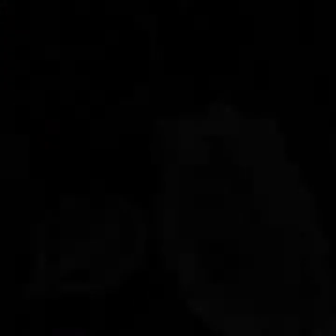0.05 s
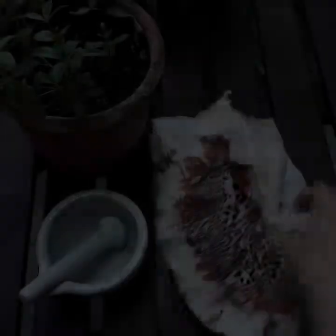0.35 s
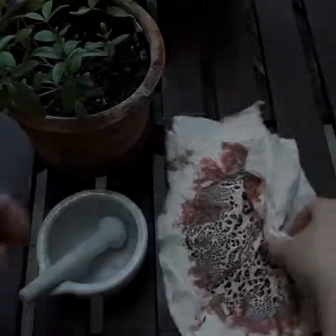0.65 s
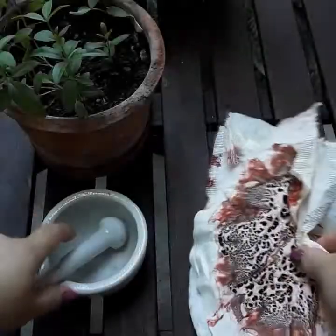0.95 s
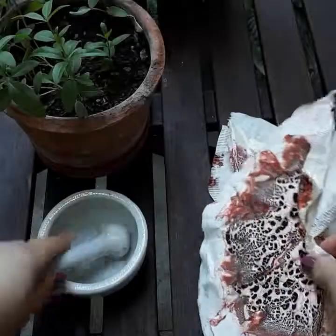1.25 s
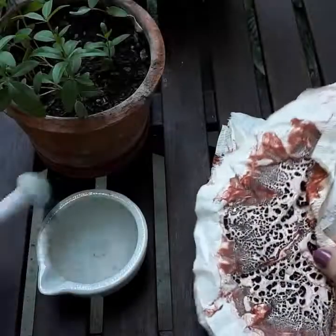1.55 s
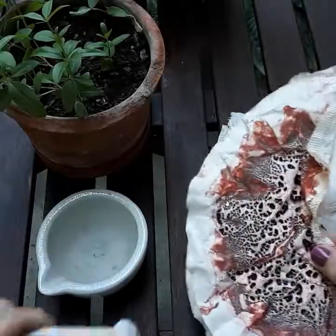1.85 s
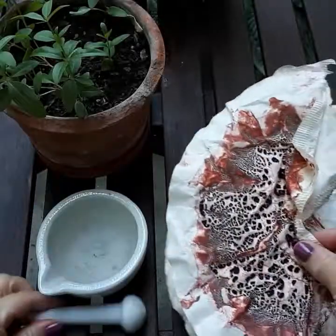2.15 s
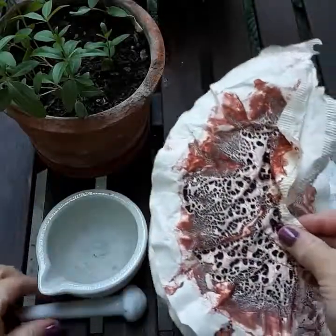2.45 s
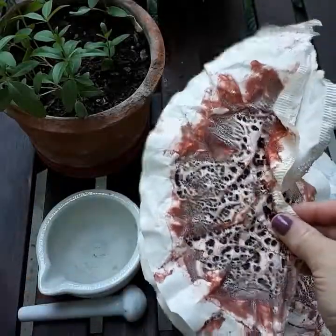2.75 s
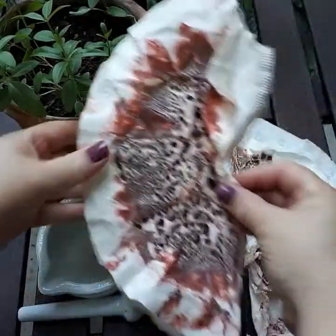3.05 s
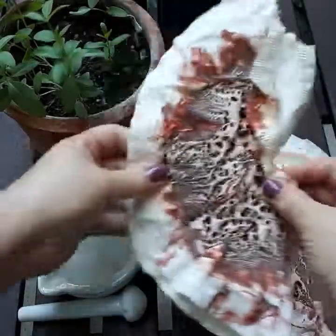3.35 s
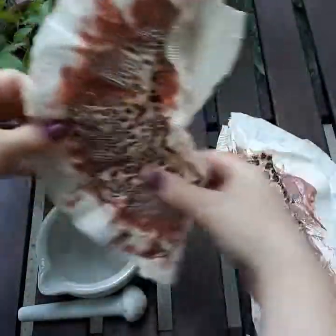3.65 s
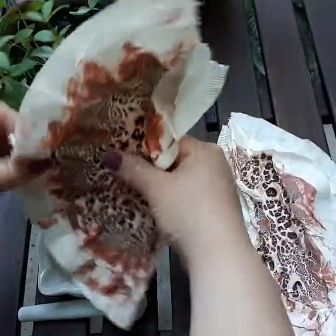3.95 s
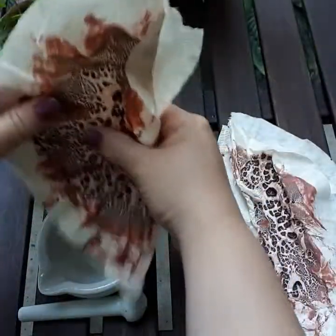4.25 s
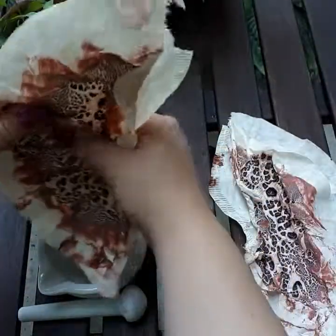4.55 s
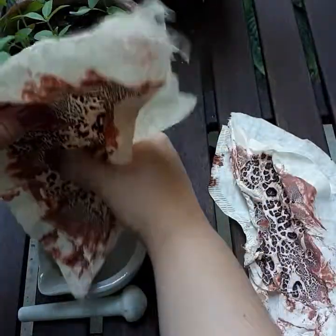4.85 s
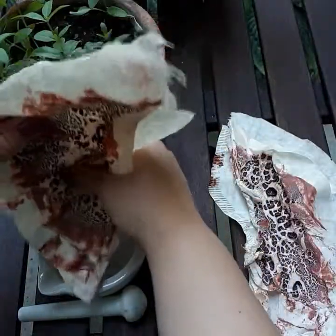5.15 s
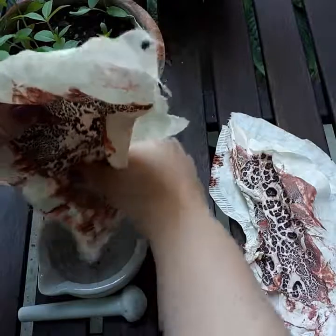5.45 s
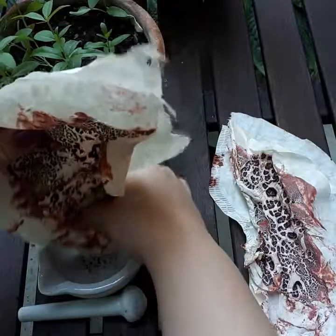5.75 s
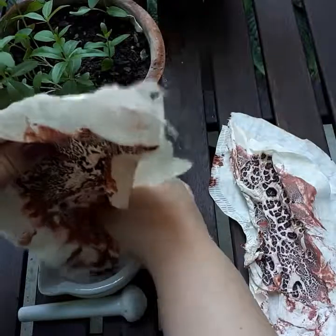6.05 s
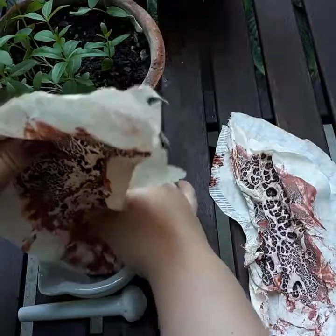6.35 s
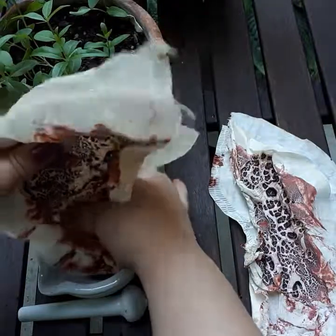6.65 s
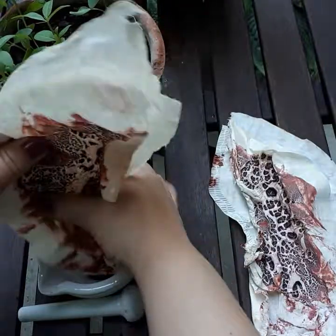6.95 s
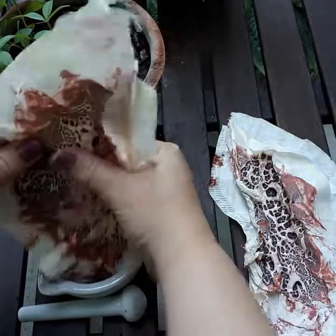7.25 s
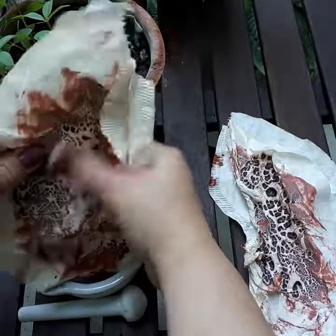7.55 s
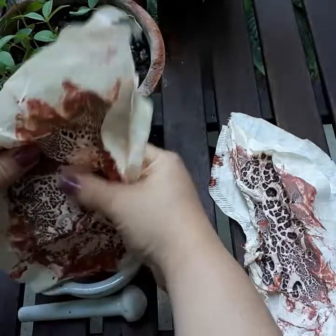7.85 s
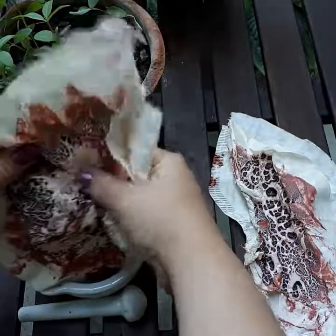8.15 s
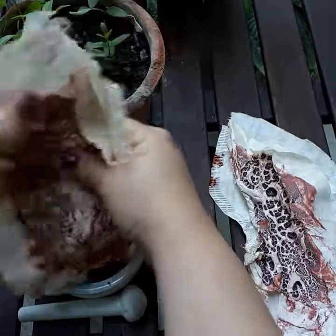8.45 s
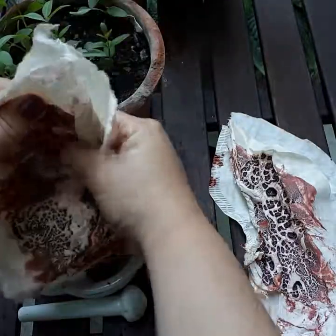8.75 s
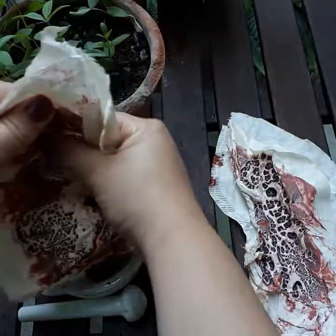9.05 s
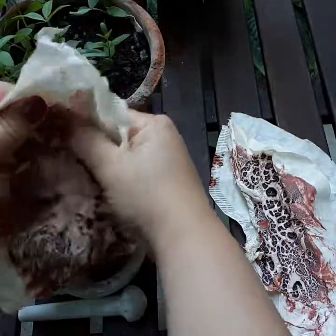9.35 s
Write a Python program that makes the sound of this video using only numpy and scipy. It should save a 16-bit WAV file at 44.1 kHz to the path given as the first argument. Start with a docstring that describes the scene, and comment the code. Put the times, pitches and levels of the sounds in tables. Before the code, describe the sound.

Crusty paper towel rasps and crackles between the fingers after a porcelain pestle scrapes, knocks on wood and clinks against a mortar.

```python
"""Crusty paper rasps and crackles over a faint outdoor rumble, with a few knocks and porcelain clinks early on.
A paper towel crusted with dried pigment is picked up from a slatted wooden table. A porcelain pestle
slides out of its mortar, knocks twice on the wood and rolls against the bowl, which rings.
Then the towel is flexed and rubbed over the mortar: fibres slip, the crust snaps, the sheet buckles."""
import sys
import numpy as np
from scipy import signal
from scipy.fft import rfft, irfft
from scipy.io import wavfile
from scipy.ndimage import uniform_filter1d

SR = 44100
rng = np.random.default_rng(int(sys.argv[2]) if len(sys.argv) > 2 else 0)


def file_out(sig):
    """Save sig as 16-bit WAV at sys.argv[1]."""
    # one column per channel
    cols = np.atleast_2d(sig).T
    # limit, then scale
    lim = np.clip(cols, -1, 1)
    pcm = np.round(lim * 32767).astype(np.int16)
    wavfile.write(sys.argv[1], SR, pcm)


N = 423801
TIME = np.arange(N) / SR
LEFT_RIGHT = np.array([[1], [-1]])


def from_db(db):
    """Decibels to gain."""
    return 10 ** (np.asarray(db) / 20)


def rms_one(x):
    """Scale to rms 1."""
    return x / np.sqrt(np.mean(x ** 2) + 1e-20)


def peak_one(x):
    """Scale the loudest 2 ms to rms 1."""
    return x / np.sqrt(uniform_filter1d(np.mean(x ** 2, axis=0), size=88).max() + 1e-20)


def evened(x):
    """Hold the rms at 1 over 25 ms; faster flicker stays."""
    return x / np.sqrt(uniform_filter1d(np.mean(x ** 2, axis=0), size=1100) + 1e-9)


def add(out, start_s, x):
    """Mix in a stereo sound."""
    at = max(int(start_s * SR), 0)
    out[:, at:at + x.shape[1]] += x[:, :N - at]


def drift(per_s):
    """Random wander, rms 1."""
    knots = rng.standard_normal(8192)
    return rms_one(np.interp(TIME * per_s, np.arange(len(knots)), knots))


def closeness(hz, centre_hz, octaves):
    """Bell curve over pitch, 1 at the centre."""
    return np.exp(-(np.log2(hz / centre_hz) / octaves) ** 2)


def band(x, low_hz, high_hz):
    """Butterworth band-pass."""
    sos = signal.butter(3, [low_hz, min(high_hz, .45 * SR)], "band", fs=SR, output="sos")
    return signal.sosfilt(sos, x)


def resonance(x, hz, width_hz):
    """Resonator, peak gain 1."""
    return signal.lfilter(*signal.iirpeak(hz, hz / width_hz, fs=SR), x)


def colour(x, spectrum):
    """Minimum-phase filter from rows of (frequency [Hz], gain [dB])."""
    hz, db = np.transpose(spectrum)
    grid_hz = np.maximum(np.fft.rfftfreq(8192, 1 / SR), 1)
    gain = from_db(np.interp(np.log(grid_hz), np.log(hz), db))
    cepstrum = irfft(np.log(gain))
    half = len(cepstrum) // 2
    causal = np.r_[1, np.full(half - 1, 2), 1, np.zeros(half - 1)]
    response = irfft(np.exp(rfft(cepstrum * causal)))[:half]
    return signal.fftconvolve(x, response[None], axes=1)[:, :x.shape[1]]


def ports(x, lag_s):
    """A sound reaches two microphone ports lag_s apart."""
    hz = np.fft.rfftfreq(len(x), 1 / SR)
    return irfft(rfft(x) * np.exp(1j * np.pi * hz * lag_s * LEFT_RIGHT), len(x))


def stereo_noise(count, apart_hz):
    """Noise, alike in both channels below apart_hz, unrelated above."""
    mid, side = rng.standard_normal((2, count))
    side = signal.lfilter(*signal.butter(1, apart_hz, "high", fs=SR), side)
    return mid + side * LEFT_RIGHT


def ring(modes, spread_rad, t60_scale=1):
    """Struck modes decay, each with its own phase at each port."""
    out, t = 0, TIME[:SR // 2]
    for k, (hz, db, t60_s) in enumerate(modes):
        phase = np.pi * k + spread_rad * rng.normal(0, 1, (2, 1))
        decay = from_db(db - 60 * t / (t60_s * t60_scale))
        out = out + decay * np.sin(2 * np.pi * hz * t + phase)
    return out


def outdoors(hum_hz=99.0, hum_db=-9.5):
    """Distant rumble and hiss with a wavering hum."""
    # air spectrum: (frequency [Hz], relative level [dB])
    air_spectrum = [(15, -41), (25, -18.5), (102, -8), (130, -13.5), (170, -11.5), (200, -19.5), (427, -26),
                    (476, -20.5), (607, -29), (1160, -37), (4250, -47.5), (16000, -50.5)]
    # distant rumble: (time [s], level [dB])
    rumble = [(0, -69.5), (1.4, -65), (2.4, -67), (5.2, -67), (6.4, -63.5), (9.6, -63.5)]
    air = rms_one(colour(stereo_noise(N, apart_hz=400), air_spectrum))
    hum_gain = from_db(hum_db + 3.3 * drift(3.9))
    hum = hum_gain * np.sin(2 * np.pi * hum_hz * TIME + 0.62 * drift(14))
    return from_db(np.interp(TIME, *np.transpose(rumble))) * (air + hum)


def far_tone(waver_hz=5.3):
    """A faint, nearly pure tone swells and fades in the distance."""
    # course of the tone: (time [s], pitch [Hz], level [dB])
    course = [(2.45, 470, -100), (2.6, 468, -75), (2.75, 472, -73), (2.85, 480, -74), (3.05, 470, -71),
              (3.15, 468, -100)]
    s, hz, db = np.transpose(course)
    pitch_hz = np.interp(TIME, s, hz) + waver_hz * drift(30)
    return from_db(np.interp(TIME, s, db)) * np.sin(2 * np.pi * np.cumsum(pitch_hz) / SR)


def reflections(x, wet_db=-16, t60_s=0.15):
    """Table and nearby walls return a short, slightly dull scatter."""
    t = TIME[:SR // 2]
    decay = from_db(-60 * t / t60_s) * (t > .004)
    scatter = band(stereo_noise(len(t), apart_hz=1200), 193, 8000) * decay
    scatter /= np.sqrt(np.sum(scatter ** 2) / 2)
    return from_db(wet_db) * signal.oaconvolve(x, scatter, axes=1)[:, :N]


def sliding(focus_db=7):
    """Unglazed porcelain grits along; the spot touched favours one resonance."""
    # pestle leaves the bowl, slips in the fingers, rolls on the slat:
    # (time [s], level [dB], favoured frequency [Hz], brightness [dB])
    slide = [(1.04, -95, 1410, 0), (1.07, -70, 1410, 19), (1.12, -53, 1450, 2), (1.21, -62, 1400, -10),
             (1.24, -61, 900, -4), (1.285, -57, 720, -14), (1.35, -82, 720, 9.5), (1.63, -97, 1800, -3),
             (1.71, -68, 1900, 4), (1.78, -73, 1900, 2), (1.83, -94, 1800, -3), (2.07, -98.5, 420, -11.5),
             (2.12, -62, 450, -24), (2.22, -71, 1380, -17), (2.29, -100, 1400, -24)]
    # porcelain resonances: (centre [Hz], width [Hz], gain [dB])
    bowl = [(420, 98, -4.5), (720, 770, -1.5), (1440, 560, -1), (2420, 700, -2), (5450, 530, 3),
            (6700, 1400, 1)]
    s, *columns = np.transpose(slide)
    level_db, favoured_hz, bright_db = (np.interp(TIME, s, c) for c in columns)
    grit = stereo_noise(N, apart_hz=2940) * from_db(2.1 * drift(370))
    out = 0
    for hz, width_hz, db in bowl:
        gain = from_db(db + focus_db * closeness(hz, favoured_hz, 0.64) + bright_db * (hz > 3000))
        out = out + gain * resonance(resonance(grit, hz, width_hz), hz, width_hz)
    return from_db(level_db) * evened(out)


def knocks(thud_t60_s=0.11, strike_s=0.0011):
    """Porcelain hits a slat: a crack, the slat's main modes and a dense wash of weaker ones."""
    # pestle on the table: (time [s], thud peak [dB], crack re thud [dB])
    hits = [(2.0625, -23, -32.5), (2.0836, -32.5, -33.5), (2.2698, -28, -21), (2.2804, -29.5, -27)]
    # slat modes: (frequency [Hz], level [dB], t60 [s])
    wood = [(246.4, -18, 0.23), (438, -8.5, 0.21), (479, -11.5, 0.094), (638, 7.5, 0.031), (783, 2.5, 0.08),
            (1030, -9, 0.12), (1310, -3, 0.1), (1630, -16, 0.1), (1830, -16, 0.116), (2010, -9.5, 0.091),
            (2130, -11, 0.078), (2320, -15, 0.086), (2420, -10.5, 0.069), (2456, -21.5, 0.098)]
    # weaker modes: (frequency [Hz], relative level [dB])
    wash_spectrum = [(59, -58), (100, -1.5), (206, -13), (423, 1.5), (571, 0), (803, 6), (906, -4),
                     (1590, 0), (1940, -12), (2320, 1), (2950, -13.5), (5720, -34.5), (12000, -79.5),
                     (15600, -107), (22000, -120)]
    out, t = np.zeros((2, N)), TIME[:SR // 2]
    wash_decay = np.exp(-t / strike_s) + from_db(-6.5 - 60 * t / thud_t60_s)
    crack_decay = np.exp(-t / .002) + 0.44 * np.exp(-t / 0.02)
    for s, db, crack_db in hits:
        wash = colour(stereo_noise(len(t), apart_hz=2500) * wash_decay, wash_spectrum)
        crack = stereo_noise(len(t), apart_hz=3000) * crack_decay
        crack = band(band(crack, 3200, 6600), 4800, 11000)
        slat = peak_one(ring(wood, spread_rad=.3))
        thud = peak_one(band(peak_one(wash) + from_db(-3) * slat, 120, 9000))
        add(out, s, from_db(db) * (thud + from_db(crack_db) * peak_one(crack)))
    return out


def clinks(focus_db=8, soft_db_per_octave=16):
    """A hard tick jolts the bowl and sets it ringing; the spot touched favours some modes."""
    # pestle on the mortar: (time [s], ring [dB], contact noise [dB], favoured frequency [Hz],
    # share of the free ring time that the hand leaves [0-1])
    hits = [(0.991, -56, -62, 4740, 0.47), (1.135, -38.5, -55, 4700, 0.18), (1.276, -58, -59, 5640, 0.38),
            (2.275, -55.5, -68.5, 5300, 0.94), (2.345, -36.5, -33, 5250, 0.91)]
    # porcelain modes: (frequency [Hz], level [dB], free t60 [s])
    porcelain = [(2977, -20, 0.11), (4624, -5, 0.41), (4834, 0, 0.2), (5534, -9, 0.26), (5631, -9, 0.2),
                 (10680, -36, 0.27), (11020, -29, 0.21), (13850, -21, 0.17), (14180, -24, 0.15)]
    out, t = np.zeros((2, N)), TIME[:SR // 2]
    tick_decay = np.exp(-t / 0.0015) + 0.036 * np.exp(-t / 0.0089)
    for s, ring_db, contact_db, favoured_hz, free in hits:
        modes = []
        for hz, db, t60_s in porcelain:
            lift_db = focus_db / free * closeness(hz, favoured_hz, 0.098)
            # a held pestle touches softly and spares the high modes
            tilt_db = soft_db_per_octave * (1 - free) * np.log2(hz / favoured_hz)
            modes.append((hz, db + lift_db - tilt_db, t60_s))
        tick = band(stereo_noise(len(t), apart_hz=3000) * tick_decay, 1800, 3460)
        jolt = band(stereo_noise(len(t), apart_hz=2920) * np.exp(-t / 0.019), 320, 840)
        contact = peak_one(tick) + from_db(-6.5) * peak_one(jolt)
        ringing = peak_one(ring(modes, spread_rad=1, t60_scale=free))
        add(out, s, from_db(ring_db) * ringing + from_db(contact_db) * contact)
    return out


def twang(hz, cycles, count):
    """Stiff paper rings briefly, falling to 1/e in the given cycles."""
    t = TIME[:count]
    return np.sin(2 * np.pi * hz * t) * np.exp(-t * hz / cycles)


def paper_bands(x):
    """The cupped sheet radiates clicks; returns body, rasp and fizz bands."""
    # paper spectrum: (frequency [Hz], gain [dB])
    paper = [(88, -33.5), (150, -12), (254, -11), (494, -3), (689, -5.5), (888, -10.5), (1260, -1),
             (1900, -5.5), (2550, -5), (3920, -7), (7620, -12.5), (8900, -17.5), (11000, -13), (15100, -16),
             (16000, -33)]
    # resonances of the cupped sheet: (centre [Hz], width [Hz], gain [dB])
    cup = [(600, 97, 1), (900, 54, -5), (1350, 210, 0), (1890, 190, -0.5), (2510, 710, 4.5), (3370, 300, 2),
           (7440, 1830, 5.5), (8580, 820, -2)]
    x = colour(x, paper)
    for hz, width_hz, db in cup:
        x = x + (from_db(db) - 1) * resonance(x, hz, width_hz)
    return band(x, 100, 900), band(x, 900, 4500), band(x, 4500, 19000)


def buckles():
    """The whole sheet flips to a new shape with a dry, dull pop."""
    # pops: (time [s], peak [dB], ring [Hz])
    pops = [(3.483, -47, 560), (4.598, -40.5, 570), (4.751, -34.5, 487), (7.8433, -27.5, 450),
            (7.912, -45.5, 482), (8.573, -44, 600), (9.1315, -26, 553), (9.351, -30.5, 510)]
    out = np.zeros((2, N))
    for s, db, hz in pops:
        pop = twang(hz, cycles=0.94, count=2048) + .5 * twang(2.4 * hz, cycles=0.63, count=2048)
        add(out, s, from_db(db) * peak_one(ports(band(pop, 353, 7300), lag_s=.00002)))
    return out


def handling(grip_s=0.0037, swell_db=9.5, let_go_s=0.017):
    """Squeezes grip, swell, ease and let go; returns rasp, body and fizz gains and the fold's pitch."""
    # light rustle of the towel in the hands: (time [s], rasp [dB])
    holding = [(.4, -94), (.5, -62.5), (1.15, -66.5), (1.35, -84.5), (2.9, -103), (3.08, -72.5),
               (3.1, -66.5), (4.5, -60), (5.5, -59), (6.9, -57.5), (9.6, -55.5)]
    # squeezes and drags: (start [s], length [s], rasp at crest [dB], crest position [0-1], # body re rasp [dB],
    # fizz re rasp [dB], fold resonance [Hz]); the short row at 1.513 s is a light tick of the pestle, voiced
    # here as a brief rasp
    squeezes = [(0.447, 0.23, -57, 0.12, -4, -10, 1810), (0.619, 0.15, -51, 0.62, -4, -3.5, 1870),
                (0.794, 0.24, -51.5, 0.34, -1.5, -5.5, 1630), (1.398, 0.086, -72, 0.97, -1, 1, 1730),
                (1.513, 0.058, -71, 0.054, 3, 1, 1970), (1.685, 0.1, -70.4, 0.35, -13, -2, 2250),
                (3.101, 0.093, -47.5, 0.52, -4.5, -8.5, 1580), (3.157, 0.14, -56.9, 0.83, 0.5, -5.5, 1730),
                (3.376, 0.2, -54.5, 0.12, -5, -5.5, 1700), (3.625, 0.069, -49, 0.38, -6.5, -11, 1440),
                (3.714, 0.087, -50, 0.88, -5, -1.5, 1780), (3.917, 0.23, -49, 0.32, -6.5, -3.5, 1620),
                (4.208, 0.22, -45.5, 0.37, -6, -9, 1690), (4.471, 0.17, -42.5, 0.85, -10.5, -5.5, 1860),
                (4.641, 0.23, -37.5, 0.15, -8.5, -1.5, 1840), (4.997, 0.29, -40, 0.063, -13, -3, 1860),
                (5.35, 0.069, -38.5, 0.08, -13.5, -3, 1820), (5.524, 0.071, -42.2, 0.24, -18, 2, 2200),
                (5.618, 0.2, -46, 0.45, -11, -2, 2460), (5.907, 0.18, -36, 0.48, -14, -2.5, 2140),
                (6.019, 0.17, -41, 0.44, -11.5, -2.5, 2260), (6.245, 0.27, -39.5, 0.58, -13.5, -4.5, 1900),
                (6.528, 0.083, -44, 0.85, -3, -6, 1830), (6.641, 0.11, -37, 0.16, -7, -7, 1900),
                (6.739, 0.12, -42, 0.92, -12, -6, 1850), (6.919, 0.14, -41, 0.56, -5.5, -9, 1750),
                (7.064, 0.064, -31.5, 0.69, -13.5, -7, 2040), (7.125, 0.277, -42, 0.95, -5, -6.5, 1840),
                (7.411, 0.13, -36, 0.22, -6, -1.5, 2100), (7.592, 0.25, -38.5, 0.87, -8.5, -6.5, 1960),
                (7.764, 0.12, -32.5, 0.4, -6.5, -2.5, 2150), (7.942, 0.14, -44.2, 0.71, -3.5, -4.5, 1940),
                (8.114, 0.14, -36.5, 0.35, -8.5, -3, 1790), (8.286, 0.19, -42.5, 0.35, -6, -6, 1870),
                (8.486, 0.14, -41.5, 0.45, -6.5, -6, 1620), (8.64, 0.052, -42.5, 0.15, -4.5, -3, 1580),
                (8.759, 0.22, -38.5, 0.1, -7.5, -4, 1610), (9.021, 0.17, -42.5, 0.2, -7, -5.5, 1570),
                (9.121, 0.091, -34.5, 0.82, -7.5, -4, 1640), (9.25, 0.27, -45, 0.4, -6, -3, 1770),
                (9.411, 0.17, -36, 0.42, -4, -4, 1540)]
    t = TIME[::32]
    powers = [from_db(np.interp(t, *np.transpose(holding))) ** 2]
    timbres = [(-4.5, -4.5, 1900)]  # light rustle: (body [dB], fizz [dB], fold [Hz])
    for start_s, length_s, db, crest, *timbre in squeezes:
        swell = np.interp((t - start_s) / length_s, [0, np.clip(crest, .01, .99), 1], [-1, 0, -1])
        grip = np.exp(-np.maximum(start_s - t, 0) / grip_s)
        let_go = np.exp(-np.maximum(t - start_s - length_s, 0) / let_go_s)
        powers.append((from_db(db + swell_db * swell) * grip * let_go) ** 2)
        timbres.append(timbre)
    powers = np.array(powers)
    body_db, fizz_db, fold_hz = np.transpose(timbres)
    rasp_power = powers.sum(axis=0)
    body_gain = np.sqrt(from_db(body_db) ** 2 @ powers)
    fizz_gain = np.sqrt(from_db(fizz_db) ** 2 @ powers)
    mean_fold_hz = fold_hz @ powers / rasp_power
    return [np.interp(TIME, t, c) for c in (np.sqrt(rasp_power), body_gain, fizz_gain, mean_fold_hz)]


def fibres(clumping_db, slips_per_s=5500, size_db=2, turns_db=3, scatter_s=0.00075, patches=14):
    """Fibres slip in clumps on patches that take turns, each with its own ring and direction."""
    out, t = np.zeros((2, N)), TIME[:256]
    click = np.arange(len(t)) == 16
    clumps_db = drift(110) * clumping_db
    for hz in np.geomspace(1100, 4200, patches):
        sizes = from_db(size_db * np.minimum(rng.exponential(1, N), 5)) * rng.choice([-1, 1], N)
        slipping = rng.random(N) < slips_per_s / patches / SR
        slips = sizes * slipping * from_db(clumps_db + turns_db * drift(50))
        crack = 1.2 * click + 0.048 * np.roll(twang(hz, cycles=1.9, count=len(t)), 16)
        scatter = stereo_noise(len(t), apart_hz=5440) * np.exp(-t / scatter_s)
        patch = 0.26 * scatter + ports(crack, lag_s=.00007 * rng.normal(0.11, 1))
        out += signal.oaconvolve(slips[None], rms_one(patch), axes=1)[:, :N]
    return out


def fold(rasp, fold_hz, wander_octaves=0.17, shifts_per_s=14, uneven_db=4.5, q=9.3):
    """A fold shifts under the fingers and lifts the rasp near its pitch; its resonances come and go."""
    centre_hz = fold_hz * 2 ** (wander_octaves * drift(shifts_per_s))
    out = rasp
    for hz in np.geomspace(1100, 4000, 10):
        lift = 0.9 * closeness(hz, centre_hz, octaves=0.42) * from_db(uneven_db * drift(shifts_per_s))
        out = out + lift * resonance(rasp, hz, hz / q)
    return out


def rubbing(rasp_gain, body_gain, fizz_gain, fold_hz, light_db=-71, firm_db=-54, unsteady_db=1.75):
    """The towel rasps: fibres slip evenly under a light touch, in clumps under a firm one."""
    firmness = np.clip((20 * np.log10(rasp_gain) - light_db) / (firm_db - light_db), 0, 1)
    body, rasp, fizz = paper_bands(fibres(clumping_db=3.5 * firmness))
    rasp = fold(rasp, fold_hz)
    sheet = body_gain * evened(body) + rasp_gain * evened(rasp) + fizz_gain * evened(fizz)
    return from_db(unsteady_db * drift(35)) * sheet


def flakes(rasp_gain, lifted_s=3.1, per_s=9, over_rasp_db=4.5, spread_db=4.5, body_db=-6, fizz_db=-20):
    """Flakes break at random off the lifted towel, scaled by the squeeze; returns rows for snaps()."""
    low_hz, high_hz = 1100, 3300
    gaps, sizes, pitches = rng.random((256, 3)).T
    times_s = lifted_s + np.cumsum(2 * gaps / per_s)
    excess_db = over_rasp_db + spread_db * (2 * sizes - 1)
    crease_hz = low_hz * (high_hz / low_hz) ** pitches
    return [(s, 20 * np.log10(rasp_gain[int(s * SR)]) + db, hz, body_db, fizz_db)
            for s, db, hz in zip(times_s, excess_db, crease_hz) if s < TIME[-1]]


def snaps(flake_cracks, crack_s=0.00035, crumble_s=0.01, crease_db=-0.5):
    """A sharp crack sets a crease ringing, then the crust crumbles for some milliseconds."""
    # main cracks: (time [s], rasp peak [dB], crease ring [Hz], body re rasp [dB], fizz re rasp [dB])
    main_cracks = [(0.552, -61, 1570, -3, 7), (0.767, -45.5, 1580, -7, -22), (0.815, -47, 1160, -9, 1),
                   (0.985, -47.5, 1270, -11, 2), (1.013, -41.5, 1620, -16, -22),
                   (1.454, -53.5, 1440, -6, 1.5), (1.52, -48, 1810, -6.5, 0.5),
                   (1.886, -68, 1570, -16, -15), (1.925, -68, 1570, -5, -1), (2.822, -68.5, 1080, -3, -6),
                   (3.096, -43.5, 2220, -5.5, -10), (3.133, -34, 1150, -6.5, -9),
                   (3.154, -32.5, 1420, -6, -5.5), (3.259, -44.5, 2870, -17, -7),
                   (3.359, -36.5, 2820, -34, -13), (3.389, -45, 1290, -18, -8),
                   (4.036, -33.5, 1380, -21, -5), (4.31, -39, 1570, -15, -3), (4.368, -33.5, 1160, -23, -7),
                   (4.428, -34, 2560, -5, -20), (4.471, -38.5, 2410, -7.5, -4), (4.54, -33, 1080, -9.5, -3),
                   (4.597, -34.5, 1350, -8.5, -9), (4.682, -29, 1590, -20, -4),
                   (4.776, -30, 2780, -10, -10), (4.915, -44, 2800, -21, -1), (5.003, -35, 2710, -3, -10),
                   (5.081, -27.5, 2120, -11, -3.5), (5.131, -32, 1270, -8, -5),
                   (5.166, -28.5, 1380, -28, -10), (5.193, -27.5, 1460, -17, -14),
                   (5.244, -38, 1440, -3, -8), (5.332, -36.5, 2220, -12, -10),
                   (5.357, -30.5, 1440, -12, -19), (5.471, -42.5, 2840, -28, -6),
                   (5.544, -30, 1440, -18, -7), (5.66, -30.5, 2450, -17, -4),
                   (5.752, -31.5, 2380, -21, -12), (5.854, -40.5, 2070, -10, -13),
                   (5.924, -39.5, 1570, -9, -9), (5.959, -27, 2110, -24, -10), (5.989, -27, 1260, -9, -2),
                   (6.166, -31.5, 2180, -14, -6), (6.263, -31, 1300, -10, -31),
                   (6.295, -29, 2200, -11.5, -16), (6.361, -30, 1390, -15, -15), (6.39, -31, 2100, -23, -5),
                   (6.493, -29, 2120, -12, -6), (6.57, -33.5, 2350, -10.5, -12), (6.666, -28, 2400, -8, -6),
                   (6.697, -19, 2000, -13, -13.5), (6.823, -36.5, 2360, -5, -12),
                   (6.914, -33, 1080, -18, -13), (6.986, -26, 1230, -8, -13), (7.027, -35, 1790, -12, -12),
                   (7.088, -33.5, 1720, -1.5, -12), (7.326, -39, 3290, -19, -16),
                   (7.415, -29.5, 1310, -9, -8), (7.538, -45, 1120, 3, -9), (7.634, -34, 2620, -17, -19),
                   (7.692, -24, 1940, -12, -8), (7.734, -25, 2500, -11, -3.5),
                   (8.085, -25.5, 1860, -17, -9.5), (8.144, -35, 1420, -16, 3),
                   (8.291, -37, 3050, -19, -15), (8.329, -36.5, 1680, -11, -14),
                   (8.574, -28, 1075, -9, -10), (8.683, -32, 1050, -6, -20), (8.798, -32, 1150, -3, -19),
                   (8.858, -25.5, 1460, -21, -18), (9.074, -33, 1130, -14, -17),
                   (9.132, -24.5, 1530, -2, -22), (9.159, -24.5, 1280, -19, -21),
                   (9.326, -36.5, 2300, -3, -5), (9.563, -38, 3490, -11, 0)]
    out, t = np.zeros((2, N)), TIME[:2048]
    for s, db, hz, body_db, fizz_db in main_cracks + flake_cracks:
        crumble_db = rng.normal(-13.5, 2)
        decay = np.exp(-t / crack_s) + from_db(crumble_db) * np.exp(-t / crumble_s)
        burst = stereo_noise(len(t), apart_hz=5300) * decay
        body, rasp, fizz = map(peak_one, paper_bands(burst))
        crease = ports(twang(hz, cycles=2.2, count=len(t)), lag_s=rng.normal(0, .00005))
        rasp = peak_one(rasp + from_db(crease_db) * peak_one(crease))
        add(out, s, from_db(db) * (rasp + from_db(body_db) * body + from_db(fizz_db) * fizz))
    return out


def scene(air_pan_db=0.7, pestle_pan_db=1.0):
    """Towel near the middle, pestle and mortar slightly left, open air behind."""
    # towel position: (time [s], left gain and right loss [dB])
    towel_pan = [(0, 2), (4.2, 0.75), (5.6, 0), (8, 0), (9.6, 0.5)]
    background = outdoors() * from_db(air_pan_db * LEFT_RIGHT) + far_tone()
    pestle = knocks() + clinks() + sliding()
    rasp_gain, body_gain, fizz_gain, fold_hz = handling()
    towel = rubbing(rasp_gain, body_gain, fizz_gain, fold_hz) + buckles() + snaps(flakes(rasp_gain))
    towel_pan_db = np.interp(TIME, *np.transpose(towel_pan))
    near = towel * from_db(towel_pan_db * LEFT_RIGHT) + pestle * from_db(pestle_pan_db * LEFT_RIGHT)
    return background + near + reflections(near)


def record(dry):
    """The two ports colour the midrange differently; deep bass and top are cut."""
    low_cut_hz, high_cut_hz = 38, 15950
    x = dry + 0.42 * LEFT_RIGHT * resonance(dry, hz=1190, width_hz=320)
    x = signal.sosfilt(signal.butter(2, low_cut_hz, "high", fs=SR, output="sos"), x)
    return signal.sosfilt(signal.ellip(12, .1, 70, high_cut_hz, fs=SR, output="sos"), x)


dry = scene()
out = record(dry)
file_out(out)
```